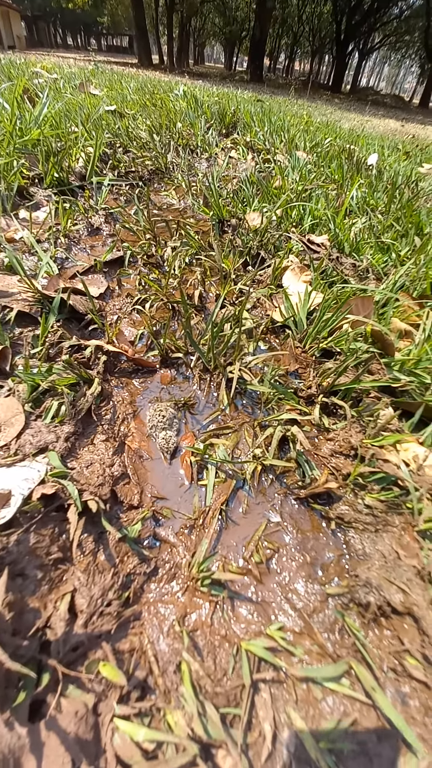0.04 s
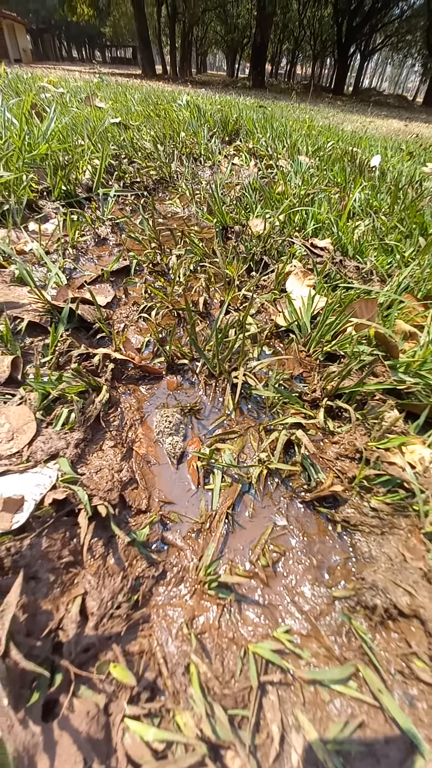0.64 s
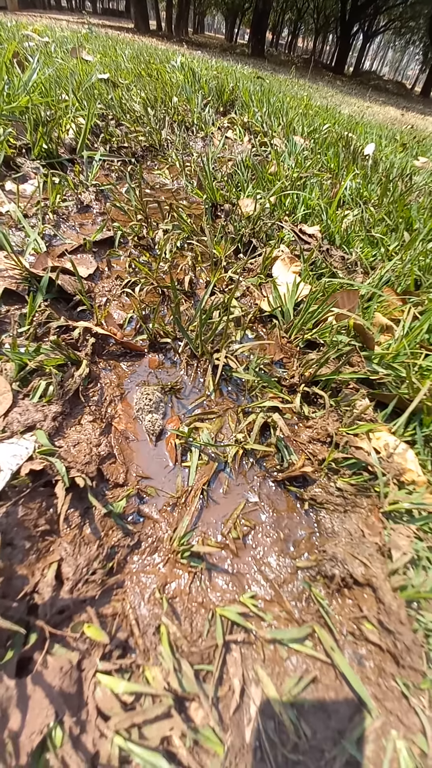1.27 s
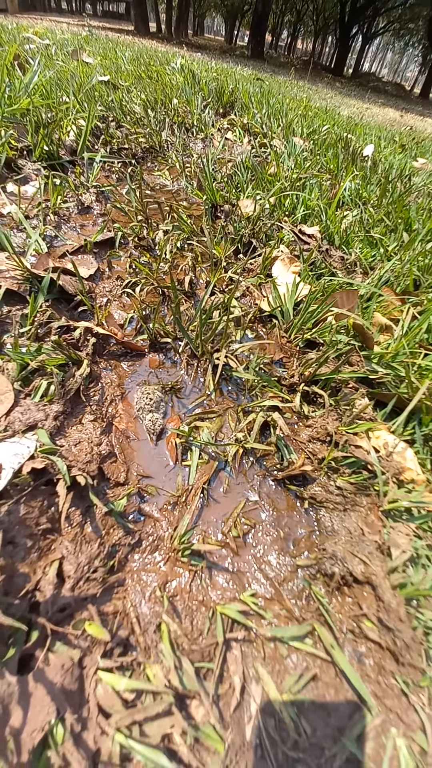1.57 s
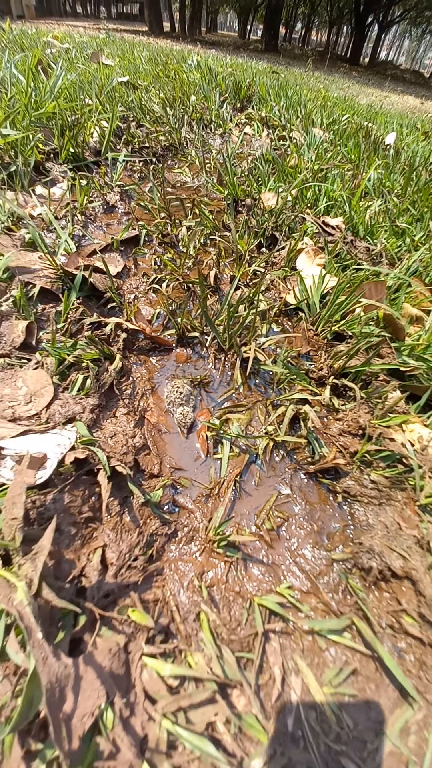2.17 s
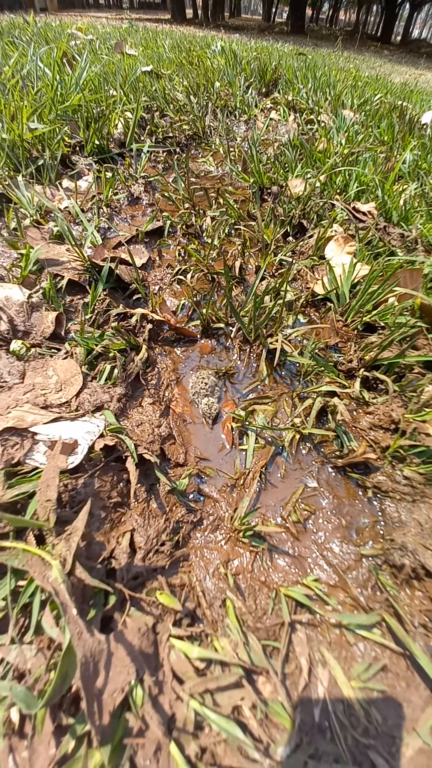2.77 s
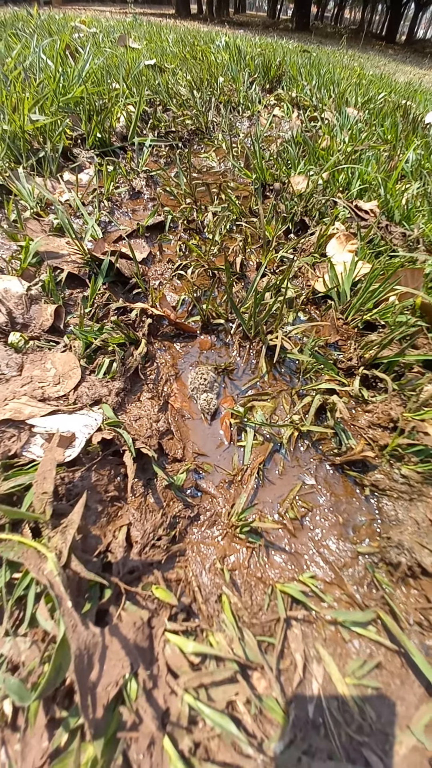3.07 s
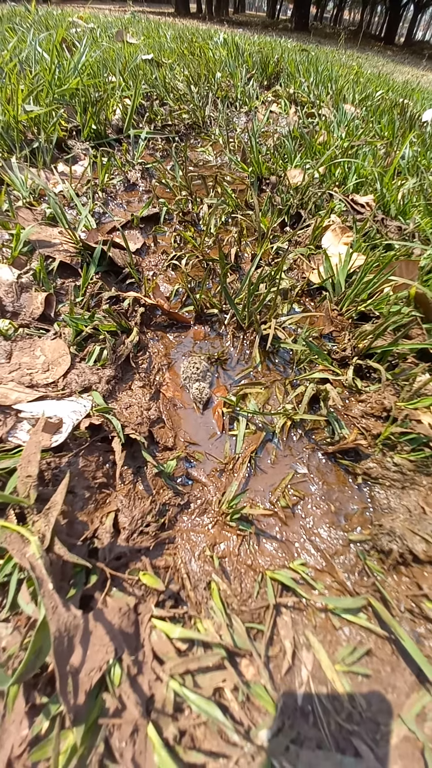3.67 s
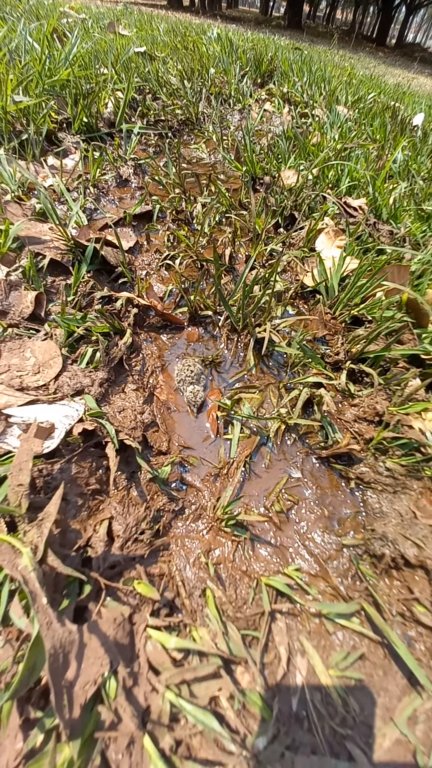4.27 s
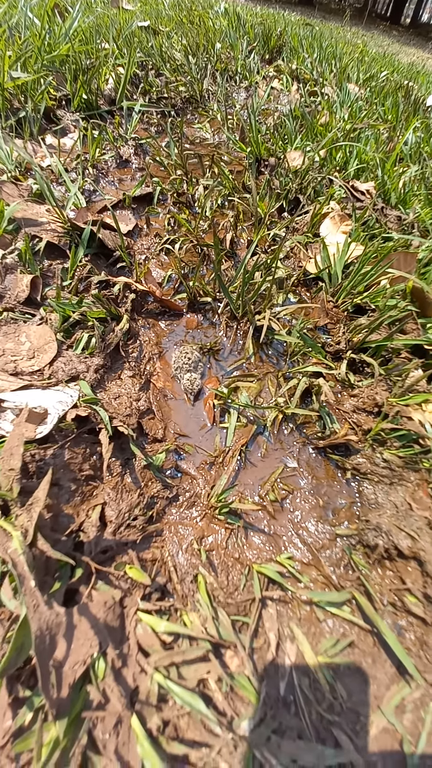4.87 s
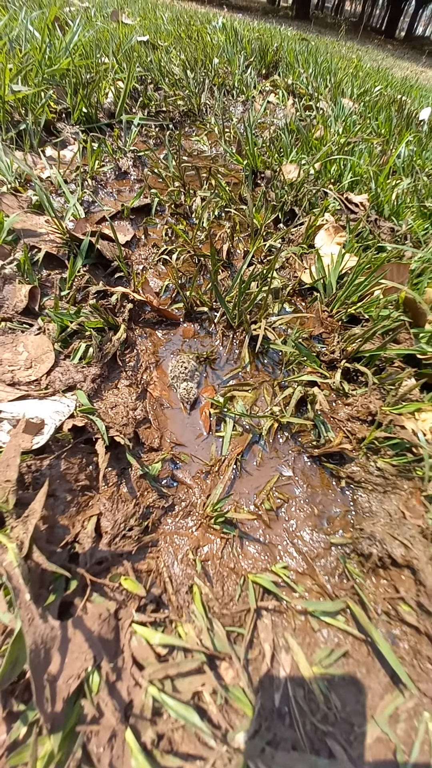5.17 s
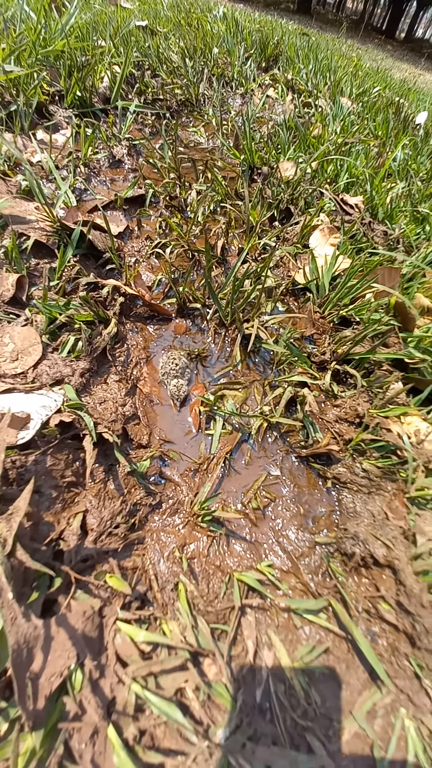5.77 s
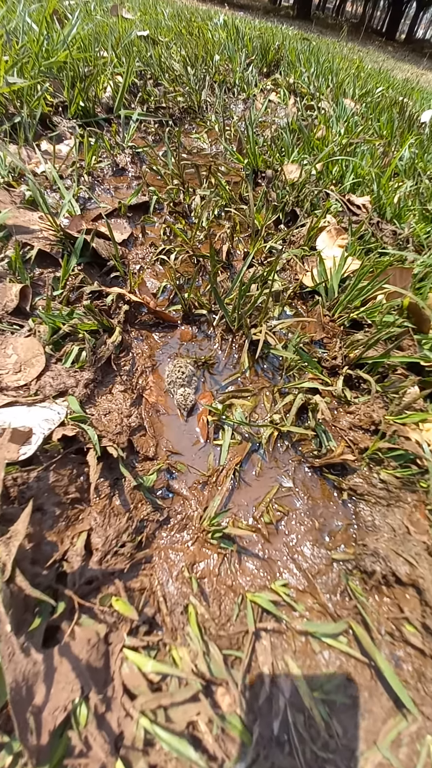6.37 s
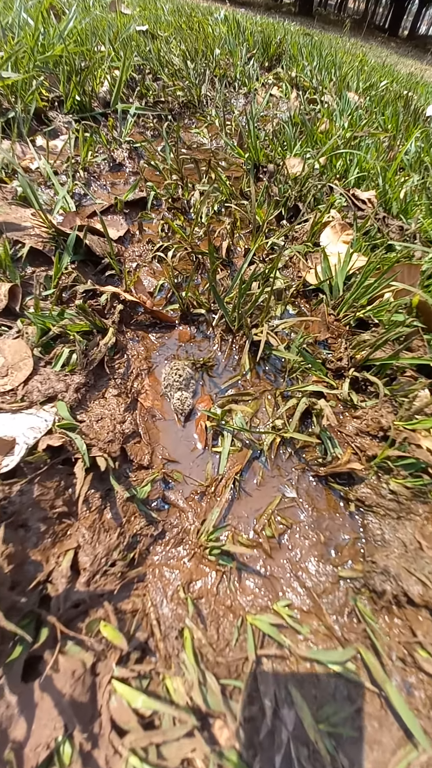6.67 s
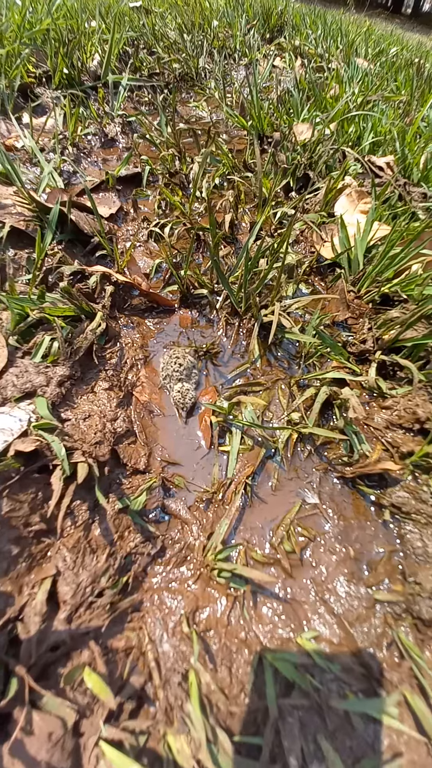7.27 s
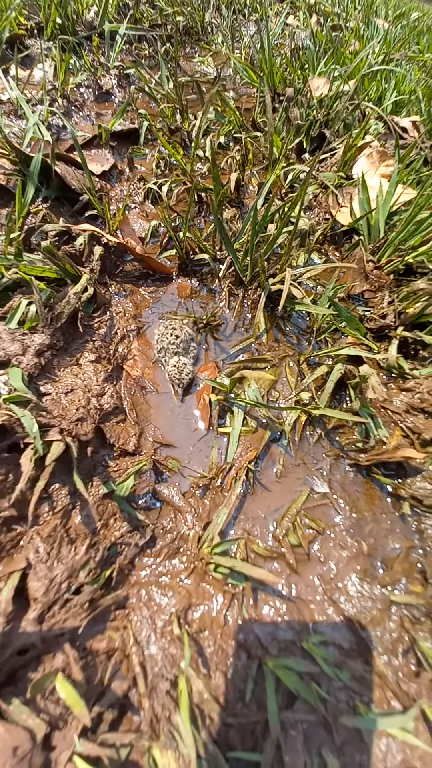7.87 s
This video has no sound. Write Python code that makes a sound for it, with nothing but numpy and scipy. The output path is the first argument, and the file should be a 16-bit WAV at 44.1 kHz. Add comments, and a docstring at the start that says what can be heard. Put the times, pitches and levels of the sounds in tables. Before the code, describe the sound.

Short, strident scolding calls from two birds alternate close by, over low wind bumps and a faint echo from trees.

```python
"""Two lapwings scold over a wet lawn at the edge of a wood, close to a microphone held low.
First one yelps; then its mate screams, a rasp that snaps into a clear falling note and breaks into a
croak. Each voice is a train of membrane pulses filtered by throat and beak, and the trees scatter it
back. As the two trade calls, a small bird chips far away and gusts of light wind bump the microphone.
Toward the end the screamer faces the microphone more squarely and the breeze rises."""
import sys
import numpy as np
from scipy import signal
from scipy.fft import rfft, irfft, next_fast_len
from scipy.io import wavfile
from scipy.ndimage import uniform_filter1d, map_coordinates

SR = 44100
rng = np.random.default_rng(int(sys.argv[2]) if len(sys.argv) > 2 else 0)


def to_wav(sig):
    """Store sig (one row per channel, or 1-D mono) as 16-bit WAV at the path in sys.argv[1].

    Samples outside -1..1 are clipped; the rate is SR.
    """
    pcm = np.clip(np.atleast_2d(sig), -1, 1) * 32767
    pcm = np.round(pcm).astype(np.int16)
    wavfile.write(sys.argv[1], SR, pcm.T)  # frames by channels


N = 349713
T = np.arange(N) / SR

# Screams: t/s, opening catch/s, time to end of rasp/s, clear note/s, squeal/s, top f/Hz, level/dB,
# share of the rasp in bursts/1, lift of the upper ring/dB
SCREAMS = [ (0.354, 0.011, .058, .064, .02, 1235, -16, 0.28, -3),
           (.854, .009, .069, 0.062, .012, 1279, -12, 0.3, -1),
           (1.462, .01, .075, .054, .004, 1237, -14, 0.5, -1),
           (2.01, 0.011, .075, .068, 0.0042, 1258, -13.5, .5, 0),
           (2.585, 0.0088, .066, .064, 0.0085, 1226, -15.5, .55, 0),
           (3.509, .01, .066, 0.057, .012, 1223, -12, 0.5, -2),
           (4.587, .008, .048, 0.084, 0.0063, 1217, -16, 0.27, -1),
           (5.29, .025, .064, .057, .018, 1216, -12.5, .1, 4.5),
           (6.674, .011, .054, 0.083, .003, 1222, -13, 0.8, 5),
           (7.186, .01, .074, .064, 0.0037, 1218, -13, 0.8, 4),
           (7.675, 0.011, .081, 0.066, 0.0039, 1241, -13, .6, 5.5)]
# Yelps: t/s, clear note/s, top f/Hz, level/dB, gape of the beak/1, lift of the lower ring/dB
YELPS = [ (-.045, 0.083, 1130, -22, 0.16, 5), (0.708, 0.074, 1134, -21, 0.09, 0.5),
         (1.103, 0.04, 1087, -22.5, 0.24, -2), (1.414, 0.037, 1071, -25.5, 0.15, -6),
         (1.733, 0.045, 1086, -22.5, 0.18, 2.5), (2.216, 0.077, 1186, -21, 0.24, 3.5),
         (2.82, 0.034, 1099, -25, 0.4, -1), (3.404, 0.085, 1207, -21.5, 0.21, 4),
         (4.794, .05, 1138, -21.5, 0.3, 5), (5.849, 0.031, 1083, -29.5, 0.54, 9.5),
         (6.416, 0.051, 1086, -26.5, .4, 0), (6.949, 0.09, 1201, -23.5, 0.9, 7.5),
         (7.552, 0.092, 1194, -23, 0.81, 6)]
# Resonances of throat and beak: f/Hz, width/Hz, level/dB
SCREAM_MODES = [(600, 400, -19), (1580, 430, -29.5), (2520, 1400, -5.5), (2927, 1185, 2.5),
                (4488, 780, 1.5), (6110, 1300, -5), (6733, 810, -6), (9600, 2900, -22), (12160, 3600, -19),
                (15000, 2300, -26)]
YELP_SHUT_MODES = [(480, 460, -20.5), (2090, 1500, -13), (3170, 1300, -3), (4480, 650, 1),
                   (6260, 1700, -10), (9600, 1700, -21), (12400, 2400, -21.5)]
YELP_OPEN_MODES = [(482, 250, -15.5), (980, 280, -23.5), (2305, 1400, 4.5), (3330, 900, -8.5),
                   (4530, 650, -9.5), (6045, 770, -6.5), (9700, 2000, -19.5), (13000, 3400, -22)]
# How squarely the birds face the microphone: t/s, nominal treble tilt/dB
FACING = [(0, 3), (2.6, 3.5), (3.5, 6), (4.6, 3), (5.3, 4), (6.6, 9.5), (7.7, 14)]
# Reverberation time of the wood: f/Hz, T60/s
WOOD_T60 = [(500, 0.087), (2300, 0.38), (6500, 0.47), (9000, 0.31), (15000, 0.22)]
# Spectrum of its echo: f/Hz, relative level/dB
WOOD_SPECTRUM = [(500, -16), (1200, -1), (2200, -5), (4400, -8.5), (6500, -14), (9000, -7.5), (15000, -10)]
# Chips of the small bird: t/s, first f/Hz, last f/Hz
CHIPS = [(.645, 6900, 5700), (1.296, 6700, 5550), (2.52, 5000, 5950), (3.1, 6100, 5250), (4.96, 6700, 5700),
         (6.23, 5000, 6100)]
# Strength of the breeze, and crests of the gusts: t/s, relative level/dB
BREEZE_LEVELS = [(0.0, -70.5), (1.7, -45.5), (1.96, -63), (2.63, -72), (2.96, -60), (3.16, -44.5),
                 (3.58, -45), (3.89, -64), (4.35, -56), (4.55, -74), (5.5, -61), (5.87, -66), (6.54, -51),
                 (6.96, -52.5), (7.49, -42), (7.93, -36.5)]
GUST_CRESTS = [(1.225, -38), (1.78, -31.5), (2.196, -40.5), (3.048, -29.5), (3.27, -38), (3.411, -31),
               (3.7, -36.5), (4.204, -32), (4.424, -42), (6.472, -36.5), (6.88, -42), (7.447, -36.5),
               (7.746, -33.5)]
# Noise spectra of breeze, buffeting and still air: f/Hz, relative density level/dB
BREEZE_SPECTRUM = [(20, -45.5), (50, -14), (82, 1), (125, -13.5), (200, -28.5), (400, -41.5), (900, -72)]
BUFFET_SPECTRUM = [(30, -26.5), (90, -14), (180, 8), (290, -4.5), (480, -25), (1000, -72)]
AIR_SPECTRUM = [(30, -14.5), (200, -0.5), (500, -7), (2300, -19), (5000, -11.5), (6700, -7), (8500, -26),
                (16000, -27)]
# Shading of the left microphone port against the right: f/Hz, level/dB
PORT_SHADING = [(500, 6), (1200, -3), (2400, 3), (3300, 0.5), (6900, 0), (7800, -33.5), (9000, -3),
                (12000, -13), (15500, -14)]
# Phase bend of the microphone body at that port: f/Hz, lead/rad
PORT_PHASE = [(300, 1), (900, 1), (1250, -0.37), (2300, -0.36), (3300, 0.36), (4500, 0.1)]

UPPER_RING, LOWER_RING = (4900, 300), (3900, 490)  # resonances that vary by call: f/Hz, width/Hz
BREAK_S, CROAK_ROUGH = .01, .07  # time a voice takes to crack, and the roughness this adds


def scream(row, burst_hz=106, lock_ratio=.868, sag_hz=184.5, sag_s=.068, tail_s=.066):
    """Mode locking: the pitch locks to the throat and slips free in a rasp, then sings and cracks."""
    start, catch_s, rasp_s, note_s, squeal_s, top_hz, db, burst_share, ring_db = row
    facing_db, = follow(FACING, start)
    sung_s = rasp_s + note_s
    crack_s = sung_s + squeal_s
    t = np.arange(0, sung_s + tail_s, 1 / SR)
    rise, swell, fall = ramp(t, 0, catch_s), ramp(t, 0, rasp_s), ramp(t, rasp_s, note_s)
    broken, croak = ramp(t, crack_s - BREAK_S, BREAK_S), ramp(t, crack_s, tail_s - squeal_s)
    rasp, squeal = during(t, catch_s, rasp_s), during(t, sung_s, crack_s)
    sinking_s = np.clip(t - rasp_s, 0, crack_s - rasp_s)
    hz = top_hz * (.87 + .11 * rise + .02 * (t > rasp_s)) - sag_hz * (sinking_s / sag_s) ** 1.35
    hz = np.where(croak > 0, hz * (.76 - .15 * croak), hz)
    # Each burst sweeps up from the locked pitch; bursts lengthen as the rasp goes on.
    cycle = (burst_hz * (t - .003) + .07 * wander(len(t), 80)) % 1
    duty = np.clip(burst_share * (.55 + .9 * swell), .03, 1)
    climb = ramp(cycle, 0, duty)
    burst = uniform_filter1d(1. * (climb < 1), size=40)
    rasp_hz = top_hz * (lock_ratio + burst * climb * (1.04 - lock_ratio))
    lock = rasp * (1 - burst) + squeal + fall ** 2 * during(t, rasp_s, sung_s) / 2
    rough = .005 + (.09 + .08 * burst) * rasp + .09 * (1 - rise) + .12 * squeal + CROAK_ROUGH * broken
    source = syrinx(hz + rasp * (rasp_hz - hz), rough, lock)
    rattle_db = 2 * (rasp + squeal) * (np.tanh(wander(len(t), 150)) - burst / 2)
    edge_db = -5 + 6 * rasp + 5.5 * broken
    source = source + (gain_of(edge_db) - 1) * top_octave(source)
    source = source * gain_of(rattle_db)
    call = beak(source, lambda f: throat(SCREAM_MODES, f), facing_db, UPPER_RING, ring_db)
    level_db = db - 8 * (1 - rise) - 4 * (1 - swell) - 4.5 * fall ** 1.1 - 10.5 * (broken + croak)
    call = call * gain_of(level_db) * (1 - croak ** 4)
    return start, place(call, pan_db=facing_db / 4 - 3, lag_ms=.3269)


def yelp(row, creak_s=.017, break_hz=945, rest_hz=1163):
    """Source and filter: a creak, an arch of pitch and a croak pass through a throat tuned to the call."""
    start, note_s, top_hz, db, gape, ring_db = row
    facing_db, = follow(FACING, start)
    croak_s, loudest_s = .015 + .78 * note_s, .42 * note_s
    crest_s = note_s * (.35 - .324 * gape)  # a wide gape peaks early
    t = np.arange(-creak_s, note_s + croak_s, 1 / SR)
    creak = 1 - ramp(t, -creak_s, creak_s)
    scoop, fall = 1 - ramp(t, 0, crest_s), ramp(t, crest_s, note_s - crest_s)
    broken, croak = ramp(t, note_s - BREAK_S, BREAK_S), ramp(t, note_s, croak_s)
    swell, fade = ramp(t, 0, loudest_s), ramp(t, loudest_s, note_s - loudest_s)
    hz = top_hz * (1 - .08 * scoop ** 2 - .3 * creak) - (top_hz - break_hz) * fall ** 1.8
    hz = np.where(croak > 0, hz * (.76 - .38 * croak), hz)
    rough = np.where(t < 0, .22, .025) + CROAK_ROUGH * broken
    source = syrinx(hz, rough, lock=0, overtone_db=-5 * (broken + creak))
    tilt_db = .13 * facing_db + 43.5 * (note_s - .1)  # longer yelps are pushed harder
    throat_length = rest_hz / top_hz  # the throat shortens for a higher call

    def shape(f):
        shut = throat(YELP_SHUT_MODES, f * throat_length)
        return shut ** (1 - gape) * throat(YELP_OPEN_MODES, f) ** gape
    call = beak(source, shape, tilt_db, LOWER_RING, ring_db)
    level_db = (db - 23.5 * np.sqrt(creak) - 4 * (1 - swell) ** 2 - 3.5 * fade ** 1.8
                - 4.5 * broken - 12.5 * croak)
    call = call * gain_of(level_db) * (1 - croak ** 3)
    return start - creak_s, place(call, pan_db=1, lag_ms=.18)


def syrinx(hz, rough, lock, overtone_db=0, smear_rad=.2):
    """Membrane oscillation: a harmonic pulse train in which locking favours harmonics 3 and 6."""
    size = len(hz)
    jitter = .22 * rough * wander(size, 600) + .002 * wander(size, 70)
    phase = 2 * np.pi * np.cumsum(uniform_filter1d(hz, size=60) * (1 + jitter)) / SR
    smooth_hz = uniform_filter1d(hz, size=60)

    def harmonic(k):
        return np.cos(k * phase - smear_rad * k * k)  # high harmonics lag, smearing each pulse
    pulses = sum(harmonic(k) * np.clip((SR / 2 - k * smooth_hz) / 3000, 0, 1) for k in range(2, 25))
    pulses = pulses * gain_of(-9 * lock) + lock * (.8 * harmonic(3) + .35 * harmonic(6))
    breath = (1 + np.cos(phase)) * rng.standard_normal(size)
    puffs = signal.sosfilt(signal.butter(4, 2100, "high", fs=SR, output="sos"), breath)
    shimmer = 1 + .7 * rough * wander(size, 400) + .08 * wander(size, 50)
    overtones = pulses * shimmer + (2.5 * rough + .04) * puffs
    return np.cos(phase) * (1 - lock / 2) + gain_of(overtone_db) * overtones


def throat(modes, hz):
    """Resonance: the modes add in power to give the gain at each frequency."""
    return np.sqrt(sum((gain_of(db) / (1 + (2 * (hz - f) / width) ** 2)) ** 2 for f, width, db in modes))


def beak(source, shape, tilt_db, ring, ring_db, low_cut_hz=200):
    """Radiation: the beak beams the highest treble forward, and a bounce off the lawn interferes."""
    bounce_s = rng.uniform(.001, .003)

    def gain(hz):
        tract = shape(hz) * gain_of(ring_db * throat([(*ring, 0)], hz))
        beam = gain_of(tilt_db * read([(1200, -.25), (2800, -.88), (5200, -.3), (12000, .53)], hz))
        ground = abs(1 + .12 * np.exp(2j * np.pi * hz * bounce_s))
        return tract * beam * ground * hz ** 2 / (hz ** 2 + low_cut_hz ** 2)
    return evened(colour(source, gain)) * signal.windows.tukey(len(source), .018)


def place(x, pan_db, lag_ms):
    """Path difference: the sound reaches the right port first; positive pan favours the left."""
    late = map_coordinates(x, [np.arange(len(x)) - lag_ms * SR / 1000], order=3)
    return np.array([late * gain_of(pan_db / 2), x * gain_of(-pan_db / 2)])


def wood(x, wet_db=-25, swell_s=.11, near_db=-28, near_s=.018, echoes_per_s=3000):
    """Reverberation: a quick scatter from the ground, then a slow soft one from the trunks."""
    t = np.arange(SR) / SR
    taps = rng.standard_normal((2, SR)) * (rng.random((2, SR)) < echoes_per_s / SR)
    hz, frame_s, bands = signal.stft(taps, SR, nperseg=256)
    decay_db = 60 * frame_s / read(WOOD_T60, hz)[:, None]
    bands = bands * gain_of(read(WOOD_SPECTRUM, hz)[:, None] - decay_db)
    trunks = signal.istft(bands, SR, nperseg=256)[1][:, :SR] * (1 - np.exp(-t / swell_s))
    ground = rng.standard_normal((2, SR)) * np.exp(-t / near_s)
    echo = (gain_of(wet_db) * evened(trunks) + gain_of(near_db) * evened(ground)) / np.sqrt(SR)
    return signal.fftconvolve(x, echo, axes=1)[:, :N]


def grass(x, db=-9, decay_s=.006):
    """Scattering: the blades spread the top octave differently into each port."""
    t = np.arange(SR // 10) / SR
    taps = evened(rng.standard_normal((2, len(t))) * np.exp(-t / decay_s)) / np.sqrt(len(t))
    return gain_of(db) * signal.oaconvolve(top_octave(x)[None], taps, axes=1)[:, :N]


def left_port(x):
    """Acoustic shadow: the microphone body shades the left port and bends its phase."""
    size = next_fast_len(N)
    bend = np.exp(1j * read(PORT_PHASE, np.fft.rfftfreq(size, 1 / SR)))
    bent = irfft(rfft(x, size) * bend, size)[:N]
    return colour(bent, lambda hz: gain_of(read(PORT_SHADING, hz)))


def small_bird(db=-67, length_s=.057):
    """Frequency modulation: thin gliding tones, made distant by strong reverberation."""
    chips, progress = np.zeros((2, N)), np.arange(0, 1, 1 / (length_s * SR))
    for start, first_hz, last_hz in CHIPS:
        hz = first_hz + (last_hz - first_hz) * progress
        chip = gain_of(db) * np.sin(np.pi * progress) * np.sin(2 * np.pi * np.cumsum(hz) / SR)
        add(chips, start, np.array([chip, chip]))
    return chips + wood(chips, wet_db=-6)


def wind(breeze_db=3, calm_db=-65, lump_hz=2.3, lump_db=5.5, strong_db=-32, left_db=-12):
    """Turbulent pressure: gusts swell over a lumpy breeze; the strongest flutter at their crests."""
    steady_db, = follow(BREEZE_LEVELS, T)
    lumps = noise([(lump_hz, 0), (3 * lump_hz, -90)])[0]
    breeze = (gain_of(calm_db) + gain_of(breeze_db + steady_db)) * gain_of(lump_db * lumps)
    rumble = (breeze + gusts(width_s=.036)) * eddies(BREEZE_SPECTRUM)
    crest = gusts(width_s=.018)
    flutter = gain_of(-5) * crest * np.minimum(crest / gain_of(strong_db), 1) * eddies(BUFFET_SPECTRUM)
    return (rumble + flutter) * gain_of([[left_db], [0]])


def gusts(width_s):
    """Pressure envelope: one Gaussian bell for each gust."""
    return sum(gain_of(db) * np.exp(-((T - s) / width_s) ** 2) for s, db in GUST_CRESTS)


def eddies(spectrum):
    """Turbulence: rumble of even strength, incoherent between the ports."""
    x = noise(spectrum)
    return x / np.sqrt(abs(uniform_filter1d(x ** 2, size=2000, axis=1)) + 1e-9)


def noise(spectrum):
    """Spectral shaping: two independent channels of coloured noise, rms 1."""
    size = next_fast_len(N)
    gain = gain_of(read(spectrum, np.fft.rfftfreq(size, 1 / SR)))
    return evened(irfft(rfft(rng.standard_normal((2, size))) * gain, size)[:, :N])


def wander(size, hz):
    """Random modulation: noise of rms about 1, rolled off above hz."""
    gain = np.exp(-(np.fft.rfftfreq(SR // 2, 1 / SR) / hz) ** 2)
    return evened(irfft(rfft(rng.standard_normal(SR // 2)) * gain))[:size]


def colour(x, gain):
    """Minimum-phase filtering with the response gain(hz)."""
    log_gain = np.log(gain(abs(np.fft.fftfreq(2048, 1 / SR))) + 1e-5)
    taps = np.fft.ifft(np.exp(np.conj(signal.hilbert(log_gain)))).real
    return signal.oaconvolve(x, taps[:len(taps) // 2])[:len(x)]


def top_octave(x, hz=7800):
    """Zero-phase high-pass: the piercing part above the main resonances."""
    return signal.sosfiltfilt(signal.butter(4, hz, "high", fs=SR, output="sos"), x)


def gain_of(db):
    """Amplitude ratio of a level in decibels."""
    return 10 ** (np.asarray(db) / 20)


def evened(x):
    """Normalisation to rms 1."""
    return x / np.sqrt(np.mean(x ** 2) + 1e-20)


def read(points, hz):
    """Interpolation of a spectrum on a log-frequency axis."""
    f, value = np.transpose(points)
    return np.interp(np.log(hz + 1), np.log(f + 1), value)


def follow(rows, at):
    """Linear interpolation of each column in time."""
    knots, *columns = np.transpose(rows)
    return [np.interp(at, knots, column) for column in columns]


def ramp(t, start, length):
    """Linear rise from 0 at start to 1 after length."""
    return np.clip((t - start) / length, 0, 1)


def during(t, start, end):
    """Gate: 1 between two times, with quick soft edges."""
    return uniform_filter1d(1. * ((t > start) & (t < end)), size=40)


def add(mix, s, sound):
    """Superposition of a stereo sound on the mix at time s."""
    at = round(s * SR)
    part, sound = mix[:, max(at, 0):], sound[:, max(-at, 0):]
    part[:, :sound.shape[1]] += sound[:, :part.shape[1]]


def scene(air_db=-75):
    """Superposition at the two ports: lapwings and their echo, the small bird, wind and still air."""
    birds = np.zeros((2, N))
    for row in SCREAMS:
        add(birds, *scream(row))
    for row in YELPS:
        add(birds, *yelp(row))
    left, right = birds + wood(birds)
    lapwings = np.array([left_port(left), right]) + grass(right)
    return lapwings + small_bird() + wind() + gain_of(air_db) * noise(AIR_SPECTRUM)


def record(dry, knee=.6, headroom=.25, edge_hz=15900):
    """Soft saturation rounds the highest peaks, and a low-pass limits the band."""
    held = np.clip(dry, -knee, knee)
    rounded = held + headroom * np.tanh((dry - held) / headroom)
    low_pass = signal.firwin(511, edge_hz, window=("kaiser", 9), fs=SR)
    return signal.oaconvolve(rounded, low_pass[None], "same")


dry = scene()
out = record(dry)
to_wav(out)
```